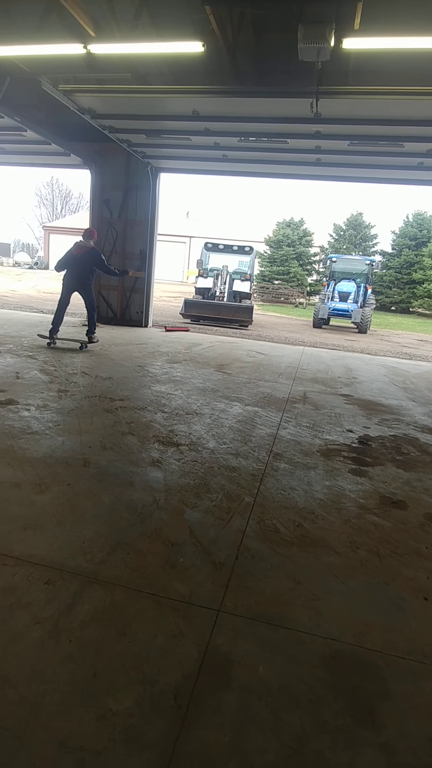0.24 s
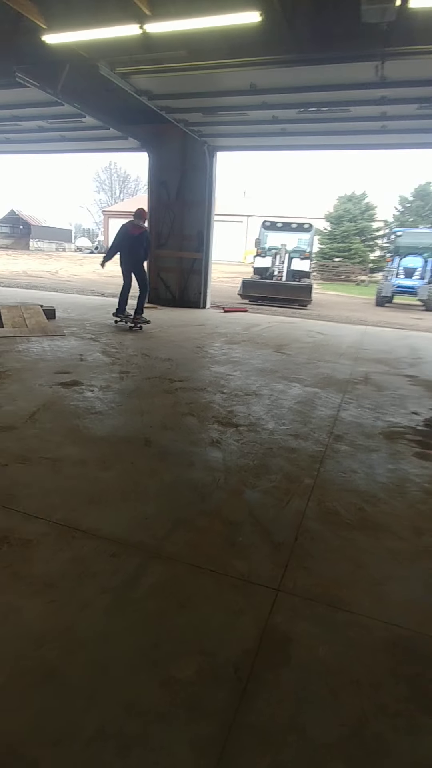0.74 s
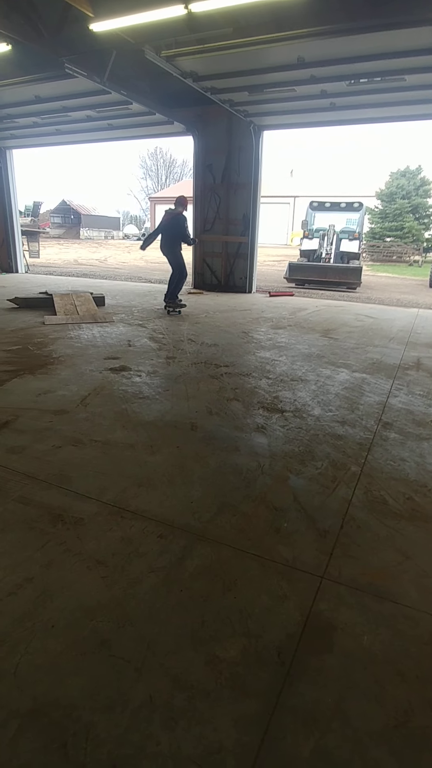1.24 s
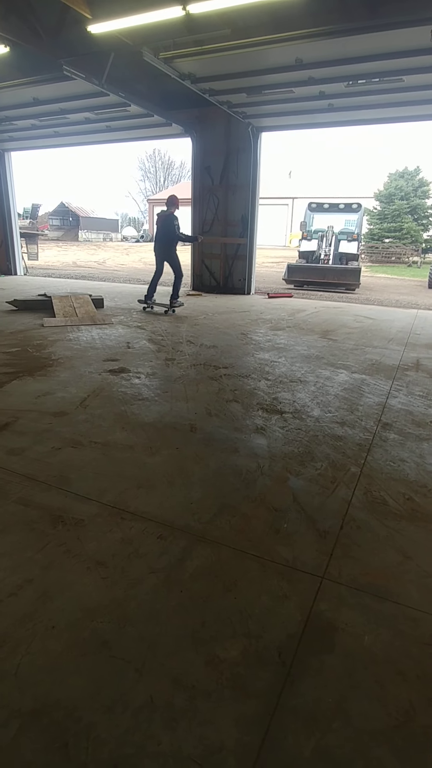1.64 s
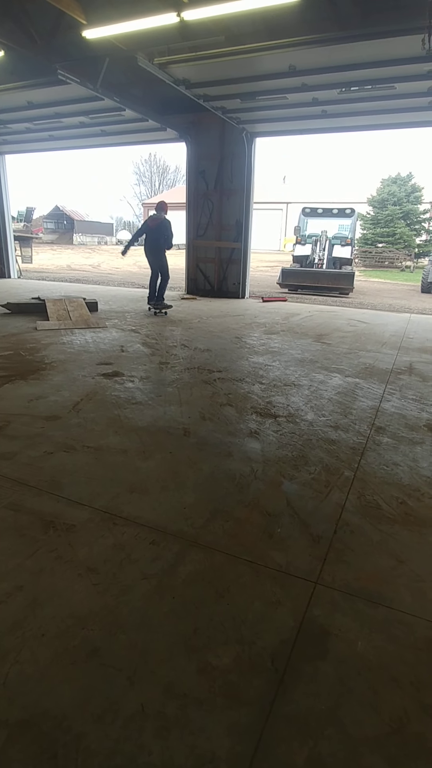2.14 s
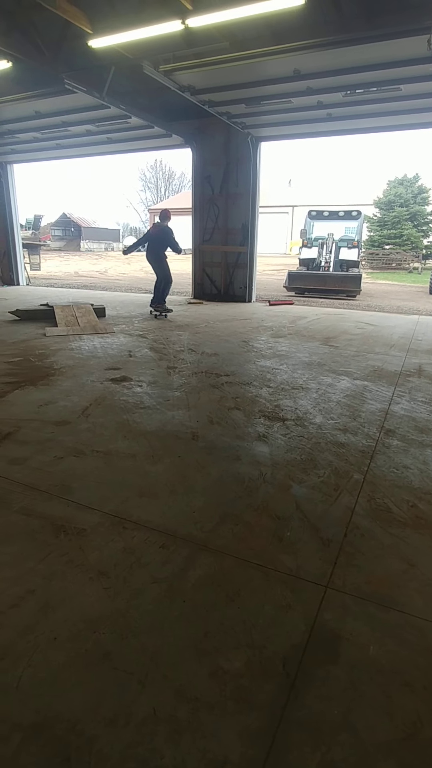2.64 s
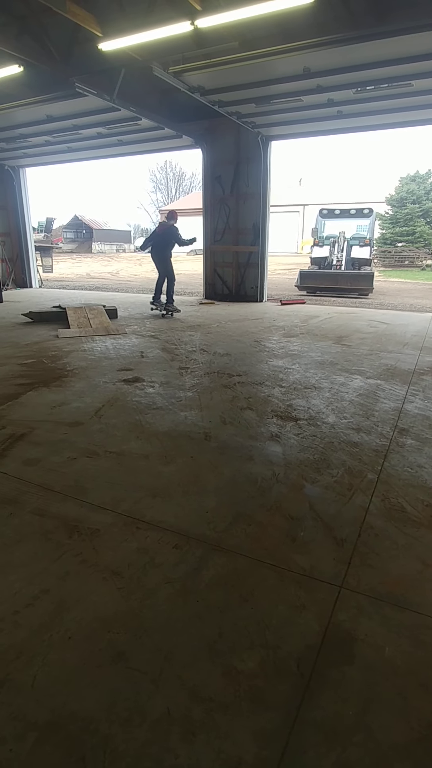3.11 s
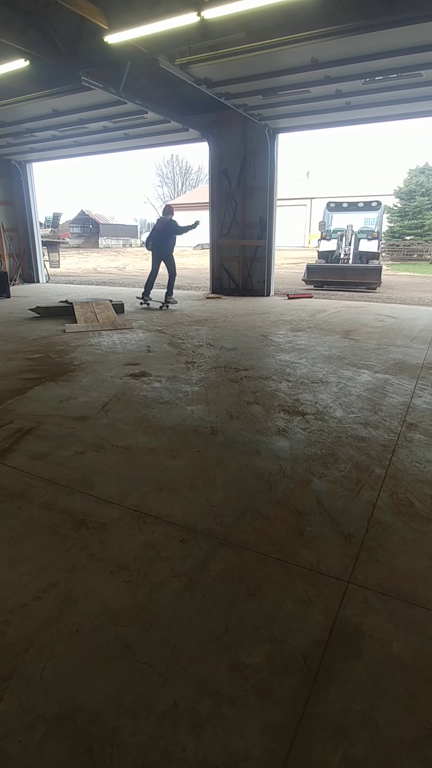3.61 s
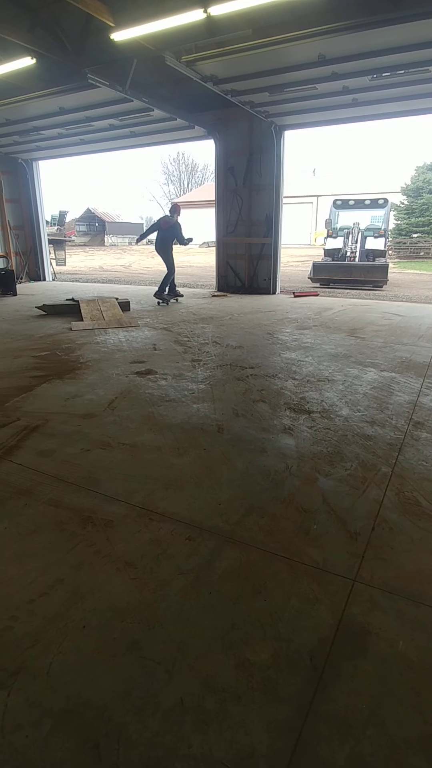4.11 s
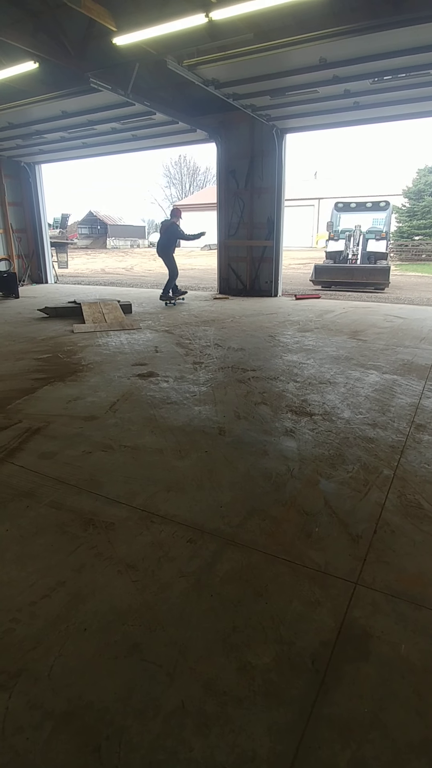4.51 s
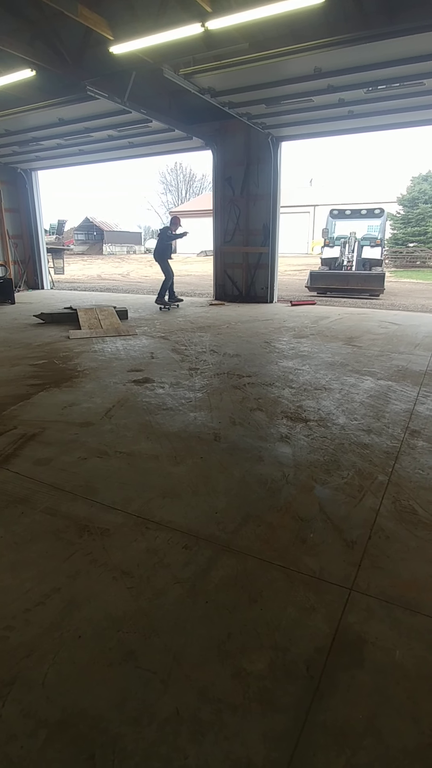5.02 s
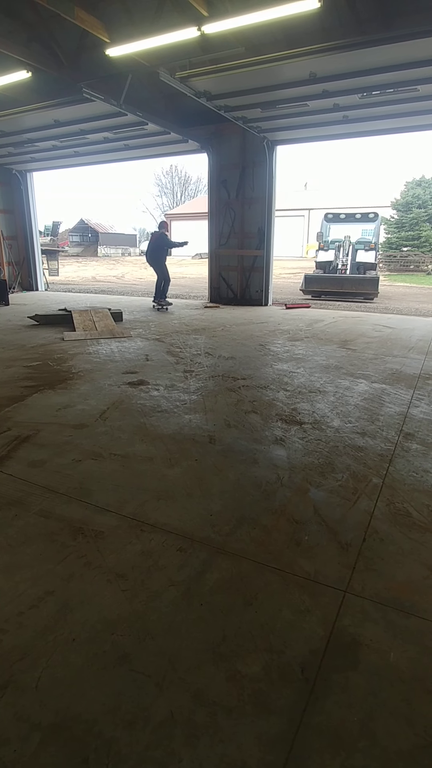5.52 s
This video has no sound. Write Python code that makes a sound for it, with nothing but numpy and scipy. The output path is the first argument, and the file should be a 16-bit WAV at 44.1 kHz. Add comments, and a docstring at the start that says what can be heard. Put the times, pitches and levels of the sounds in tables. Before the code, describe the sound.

A skateboard swings from side to side on a concrete floor, its front wheels knocking down about three times a second. Some landings skid with a short bark, and between them the wheels rumble and crunch softly. The knocks drop away briefly about two thirds through, then resume. Everything echoes in a large steel shed, heard from about ten metres away and louder on the left.

```python
"""A skateboard tic-tacs across the concrete floor of a large steel shed, some ten metres from a phone.
The front wheels mostly land one just after the other, ringing deck and trucks; on some landings they
skid with a short bark. Between knocks the wheels rumble and the trucks squeak faintly.
Roof and walls echo it all back to two microphones, the right one facing away."""
import sys
import numpy as np
from scipy import signal
from scipy.fft import rfft, irfft, next_fast_len
from scipy.io import wavfile

SR = 44100
rng = np.random.default_rng(int(sys.argv[2]) if len(sys.argv) > 2 else 0)


def store_wav(level_fs):
    """Save 16-bit WAV to argv[1]."""
    pcm = np.round(np.clip(np.atleast_2d(level_fs), -1, 1) * 32767)
    wavfile.write(sys.argv[1], SR, pcm.T.astype(np.int16))


N = 253575
LEAD = SR // 4  # the ride starts early, so the shed already echoes at time zero
TIME = np.arange(-LEAD, N) / SR


def undb(db):
    """Decibels to gain."""
    return 10 ** (np.asarray(db) / 20)


def at(points, hz):
    """Read (frequency [Hz], value) points on a log-frequency axis."""
    f, value = np.transpose(points)
    return np.interp(np.log(np.maximum(hz, 1)), np.log(f), value)


def causal(log_gain):
    """Minimum-phase frequency response with the given natural-log gain."""
    cepstrum = irfft(log_gain)
    half = len(cepstrum) // 2
    cepstrum[1:half] *= 2
    cepstrum[half + 1:] = 0
    return np.exp(rfft(cepstrum))


def colour(x, points):
    """Causal filter through (frequency [Hz], gain [dB]) points."""
    n = 2 * next_fast_len(len(x) // 2 + SR // 20)
    gain = undb(at(points, np.fft.rfftfreq(n, 1 / SR)))
    return irfft(rfft(x, n) * causal(np.log(gain)))[:len(x)]


def unit(x):
    """Scale to an energy of one."""
    return x / np.sqrt(np.sum(x ** 2, axis=-1, keepdims=True))


def fade(t, t60):
    """Exponential decay, 60 dB down after t60 seconds."""
    return np.exp(-np.log(1000) * t / t60)


def walk(rate, size):
    """Smooth random wander with a spread near one, up to 2000 turns a second."""
    knots = rng.standard_normal(size // 20 + 2)
    return np.interp(np.arange(size) * rate / SR, np.arange(len(knots)), knots)


def noise(points):
    """Coloured noise with an rms of one."""
    x = colour(rng.standard_normal(len(TIME)), points)
    return x / x.std()


def add(track, s, sound, db):
    """Place a unit-energy sound; db is its rms when spread over a tenth of a second."""
    start = max(int(s * SR) + LEAD, 0)
    part = sound[:len(track) - start]
    track[start:start + len(part)] += part * undb(db) * np.sqrt(SR / 10)


# rolling strength, greater while the rider keeps up speed: (time [s], level [dB])
ROLL_LEVELS = [(0.0, -54), (1.75, -49), (4.63, -56.5), (5.03, -48.5), (5.3, -55.5), (5.75, -53)]
# the rear wheels grind in the widest swings: (peak time [s], grit boost [dB])
WIDE_SWINGS = [(.55, 10), (1.9, 18), (2.9, 21)]
# rumble through the deck: (frequency [Hz], relative density [dB])
RUMBLE_SPECTRUM = [(25, -22), (45, -23.5), (62, -0.5), (75, -7), (87, 10.5), (102, -18.5), (135, -5.5),
                   (200, -31.5), (400, -56)]
# grit under the wheels: (frequency [Hz], relative density [dB])
GRIT_SPECTRUM = [(100, -23.5), (170, 9.5), (300, 7.5), (420, 6), (600, 1), (800, -0.5), (1100, -11),
                 (2000, -17), (3200, -34), (6500, -39), (10000, -51.5)]
def rolling(rumble_db=7.5, grit_db=-7.5, throb_db=2, bump_db=3, half_swing_s=.28):
    """Out on the concrete the wheels rumble and crunch unevenly, the crunch harder in a wide swing."""
    roll_db = np.interp(TIME, *np.transpose(ROLL_LEVELS))
    swing_db = sum(db * np.clip(1 - np.abs(TIME - s) / half_swing_s, 0, 1) for s, db in WIDE_SWINGS)
    throb, bumps = walk(12, len(TIME)), walk(60, len(TIME))
    rumble = noise(RUMBLE_SPECTRUM) * undb(rumble_db + throb_db * throb)
    grit = noise(GRIT_SPECTRUM) * undb(grit_db + swing_db + bump_db * bumps)
    return undb(roll_db) * (rumble + grit)


# still outdoor air: (frequency [Hz], relative density [dB])
AIR_SPECTRUM = [(25, -34), (80, 3.5), (200, -7.5), (700, -20.5), (1600, -12.5), (3200, -24), (6000, -20.5),
                (10000, -35), (14000, -27), (16000, -42.5)]
def outdoor_air(level_db=-63):
    """A faint, steady bed of air, independent at each microphone."""
    return undb(level_db) * np.array([noise(AIR_SPECTRUM), noise(AIR_SPECTRUM)])


# front-wheel landings; thump, clack and click set the tone, and a lead of 0 is a flat landing:
# (time [s], level [dB], low thump [dB], woody clack [dB], metal click [dB], first wheel's lead [s])
FRONT_LANDINGS = [(-.09, -21.5, 5, 1, -14, 0.0002), (.286, -15, 16, -12.5, -17, 0),
                  (.636, -10, -1.5, -12, -24.5, 0.0011), (.976, -14.5, 4, -4.5, -12, 0.01),
                  (1.287, -13, -6.5, 3.5, -15.5, 0.0003), (1.694, -9.5, -1.5, -5.5, -20, 0.0087),
                  (2.008, -7.5, -11, 0.5, -16.5, .009), (2.347, -18.5, .5, -8.5, -22.5, 0.000083),
                  (2.651, -11, -5, -3, -22.5, 0.0045), (2.991, -24.5, -2, -9, -19, 0.00018),
                  (3.261, -15.5, -6, -4.5, -22.5, .021), (3.619, -10.5, -5.5, -4, -10, .014),
                  (4.184, -34.5, -1.5, -1.5, -24, 0), (4.256, -30.5, -10.5, -5.5, -31, 0),
                  (4.797, -11, -8, -2.5, -14.5, .015), (5.120, -28, -5, 2, -16.5, 0),
                  (5.470, -19, -10.5, -10, -19, 0.0013)]
# the first wheel, lighter and rounder, relative to its landing:
# (level [dB], thump [dB], clack [dB], click [dB])
FIRST_TOUCH = (-15, 5.5, -1, -5)
def wheel_blows():
    """Every landing is one blow, with a lighter touch before it when the board is tilted."""
    for s, *blow, lead_s in FRONT_LANDINGS:
        yield (s, *blow)
        if lead_s > 0:
            yield (s - lead_s, *np.add(blow, FIRST_TOUCH))


# urethane striking concrete: (frequency [Hz], relative density [dB])
CRACK_SPECTRUM = [(100, -16), (260, 0.5), (420, -4.5), (800, 5.5), (1300, -1.5), (2100, -4), (2650, -8),
                  (4000, -5), (5200, -1), (6700, 1.5), (8300, -8), (10500, -29.5), (13500, -13.5),
                  (16000, -36.5)]
def wheel_crack(t, crack_t60=0.012, rattle_db=-26, rattle_t60=0.093):
    """A wheel cracks against the floor and the hardware rattles briefly after it."""
    envelope = fade(t, crack_t60) + undb(rattle_db) * fade(t, rattle_t60)
    spectrum = rfft(rng.standard_normal(len(t)) * envelope)
    # an even spectrum leaves the burst no pitch of its own
    burst = irfft(spectrum / causal(np.log(np.abs(spectrum) + 1e-12)))
    return unit(colour(burst, CRACK_SPECTRUM))


# modes of deck, trucks and wheels: (frequency [Hz], relative level [dB], t60 [s])
BOARD_MODES = [(89.6, -9, 0.062), (146, 1, 0.069), (162.2, -4, 0.12), (227.7, -2.5, 0.037),
               (271.4, -4, 0.04), (315.5, -6, 0.069), (484.3, -2.5, 0.033), (545, -3, 0.028),
               (674, -8, 0.068), (733, -3, 0.018), (868, -9, 0.036), (984, -11, 0.024), (1211, -5.5, 0.022),
               (1478, -6.5, 0.021), (1626, -7.5, 0.075), (1853, -19, 0.05), (2022, -14.5, 0.027)]
def board_ring(t, detune=0.04):
    """The struck board rings, retuned each time as the rider's feet load the deck differently."""
    hz, mode_db, t60 = np.transpose(BOARD_MODES)[:, :, None]
    loaded_hz = hz * (1 + detune * rng.standard_normal(hz.shape))
    modes = unit(np.sin(2 * np.pi * loaded_hz * t) * fade(t, t60))
    sign = (-1) ** np.arange(len(hz))[:, None]
    return unit(np.sum(sign * modes * undb(mode_db), axis=0))


def knocks(crack_db=-2.0, ring_db=-8.0):
    """Each blow cracks and rings the board; weight and angle set its colour."""
    out = np.zeros(len(TIME))
    t = np.arange(SR // 5) / SR
    for s, db, thump_db, clack_db, click_db in wheel_blows():
        knock = undb(ring_db) * board_ring(t) + undb(crack_db) * wheel_crack(t)
        tone = [(60, -6), (135, thump_db), (275, 0), (880, -0.5),
                (1400, clack_db), (2100, clack_db), (4600, click_db)]
        add(out, s, colour(knock, tone), db)
    return out


def stick_slip(table, jitter, jitter_hz, flutter_db, overtone_db):
    """Friction tones: a gliding slip rate that wavers in pitch and strength."""
    out = np.zeros(len(TIME))
    for s, length, start_hz, end_hz, db in table:
        wobble, grip = walk(jitter_hz, SR // 2), walk(jitter_hz / 2, SR // 2)
        n = int(length * SR)
        slip_hz = np.linspace(start_hz, end_hz, n) * (1 + jitter * wobble[:n])
        phase = 2 * np.pi * np.cumsum(slip_hz) / SR
        tone = np.sin(phase) + undb(overtone_db) * np.sin(2 * phase)
        envelope = undb(flutter_db * grip[:n]) * signal.windows.tukey(n, .4)
        add(out, s, unit(tone * envelope), db)
    return out


# skids and scuffs: (time [s], length [s], start pitch [Hz], end pitch [Hz], level [dB])
WHEEL_SKIDS = [(.30, 0.079, 612, 467, -22.5), (.642, 0.023, 812.3, 782, -13), (.68, 0.036, 506, 469, -23),
               (1.285, 0.033, 842, 737, -13), (1.32, 0.068, 700.4, 620, -15.5),
               (2.04, 0.064, 555.5, 525, -21), (4.256, 0.011755, 1222, 938, -36.5),
               (5.122, 0.042, 3500, 2154, -47), (5.472, 0.036, 1247, 947, -30.5)]
def wheel_skids():
    """The wheels slip sideways on the concrete with a short, rough bark."""
    return stick_slip(WHEEL_SKIDS, jitter=0.13, jitter_hz=600, flutter_db=8.5, overtone_db=-26.5)


# squeaks under the deck: (time [s], length [s], start pitch [Hz], end pitch [Hz], level [dB])
TRUCK_SQUEAKS = [(1.66, 0.019, 6550, 6750, -56.5), (2.20, 0.14, 6645, 6450, -51.5),
                 (2.40, 0.11, 7150, 8150, -57), (2.66, 0.033, 3520, 3380, -42),
                 (2.94, .05, 8560, 8760, -59), (2.99, 0.013, 3530, 3400, -61),
                 (3.44, 0.12, 6580, 6650, -60.5)]
def truck_squeaks():
    """Friction in the trucks makes thin, high squeaks, faint at ten metres."""
    return stick_slip(TRUCK_SQUEAKS, jitter=.033, jitter_hz=1500, flutter_db=4, overtone_db=-40)


def diffuse_bands(centres, spacing_m=0.21):
    """Noise in bands at two spaced microphones; long waves reach both alike."""
    hz = np.fft.rfftfreq(2 * SR, 1 / SR)
    left, other = np.exp(2j * np.pi * rng.random((2, len(hz))))
    alike = np.sinc(2 * hz * spacing_m / 343)
    field = np.array([left, alike * left + np.sqrt(1 - alike ** 2) * other])
    return np.array([irfft(field * at(np.c_[centres, band], hz)) for band in np.eye(len(centres))])


def direct_path(size, gain_db=-9, floor_db=3, right_lag_s=.0005):
    """On the way to the phone the floor reinforces longer waves and the deck shades the treble."""
    tone = [(1800, floor_db), (4000, -13.5), (12000, -1.0)]
    left = undb(gain_db) * colour(signal.unit_impulse(size), tone)
    return np.array([left, np.roll(left, int(right_lag_s * SR))])


# reverberation of the steel shed: (frequency [Hz], t60 [s], relative level [dB])
SHED_REVERB = [(64, 0.92, -1.5), (150, 0.29, -2), (294, 0.6, 6.5), (750, 0.72, 0), (2150, 0.6, 6),
               (4770, 0.54, 6.5), (7370, 0.42, -1.5), (13600, 0.37, -6.5)]
# first reflections from pillar and roof: (delay [s], gain [dB])
REFLECTIONS = [(.007, -20), (.0135, -17), (.0168, -11), (.0185, -13), (.024, -18)]
def shed(x, tail_db=-2, build_s=0.025, early_db=-7, patchy_db=2, drift_s=.0005):
    """Direct sound, reflections and a diffuse tail reach the phone; echoes shift as the rider moves."""
    t = np.arange(SR * 4 // 5) / SR
    hz, t60, band_db = np.transpose(SHED_REVERB)
    centres = np.geomspace(hz[0], hz[-1], num=9)
    band_gain = undb(at(np.c_[hz, band_db], centres))[:, None]
    decay = band_gain * fade(t, at(np.c_[hz, t60], centres)[:, None])
    bands = diffuse_bands(centres)
    # the tail is thin until the roof answers
    build_db = early_db * np.clip(2 - 2 * t / build_s, 0, 1)
    direct = direct_path(len(t))
    # each short stretch of the ride is heard from its own spot
    stride, blend = SR // 3, SR // 50
    crossfade = np.convolve(np.ones(stride), np.ones(blend) / blend)
    out = np.zeros((2, len(x) + 2 * SR))
    for start in range(0, len(x), stride):
        spot = rng.integers(SR)
        tail = np.einsum("bct,bt->ct", bands[:, :, spot:spot + len(t)], decay)
        patches_db = patchy_db * walk(400, len(t))
        response = direct + unit(tail * undb(build_db + patches_db)) * undb(tail_db)
        for delay, db in REFLECTIONS:
            arrival = delay + drift_s * rng.uniform(-1, 1, 2)
            response[[0, 1], (arrival * SR).astype(int)] += undb(db)
        part = x[start:start + len(crossfade)]
        heard = signal.fftconvolve((part * crossfade[:len(part)])[None], response, axes=1)
        out[:, start:start + heard.shape[1]] += heard
    return out[:, :len(x)]


def scene():
    """The board from ten metres across the shed, over faint outdoor air."""
    friction = wheel_skids() + truck_squeaks()
    air = outdoor_air()
    board = rolling() + knocks() + friction
    return (shed(board) + air)[:, LEAD:]


# shading of the right microphone, which faces away: (frequency [Hz], gain [dB])
RIGHT_MIC_SHADE = [(100, -5.3), (270, -3.5), (520, -9), (1000, -6), (2000, -3.5), (4000, -11.5),
                   (7500, -8.5), (12000, -15)]
def record(dry, low_cut_hz=51, top_hz=16000):
    """The phone thins the deep bass, shades the right side, clips at full scale and cuts the top."""
    low_cut = signal.butter(3, low_cut_hz, "high", fs=SR, output="sos")
    top_cut = signal.ellip(8, .2, 70, top_hz, fs=SR, output="sos")
    left, right = signal.sosfilt(low_cut, dry)
    pair = np.clip([left, colour(right, RIGHT_MIC_SHADE)], -1, 1)
    return signal.sosfilt(top_cut, pair)


dry = scene()
out = record(dry)
store_wav(out)
```